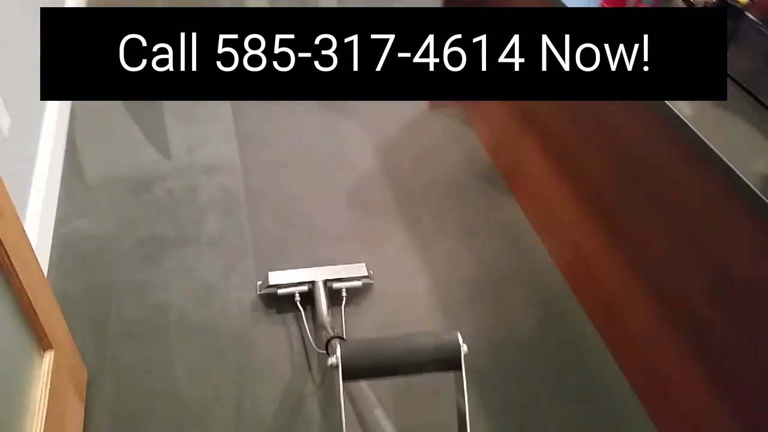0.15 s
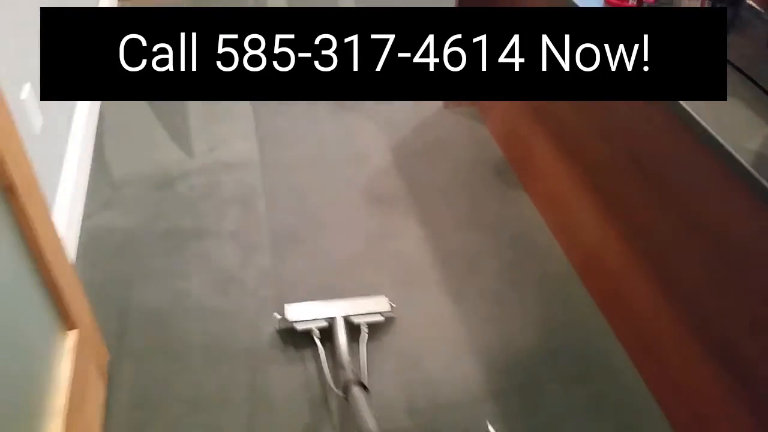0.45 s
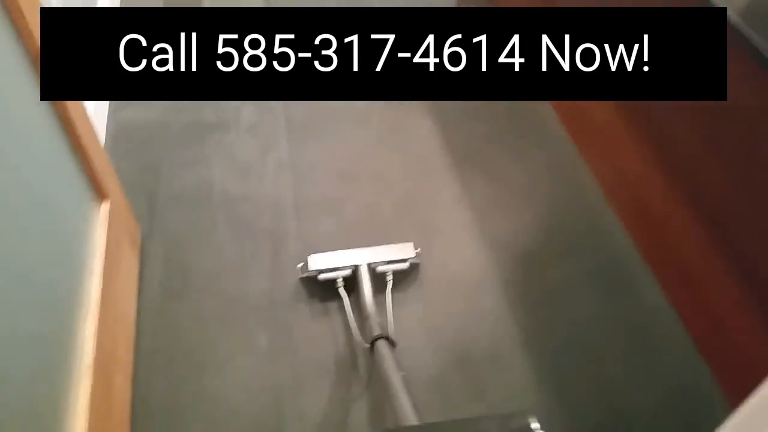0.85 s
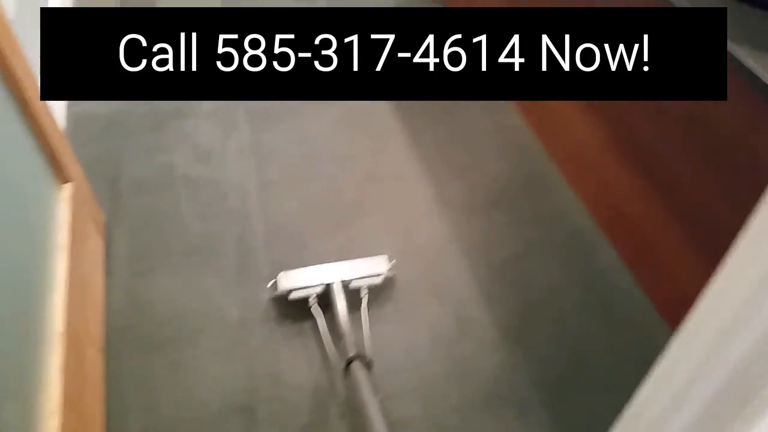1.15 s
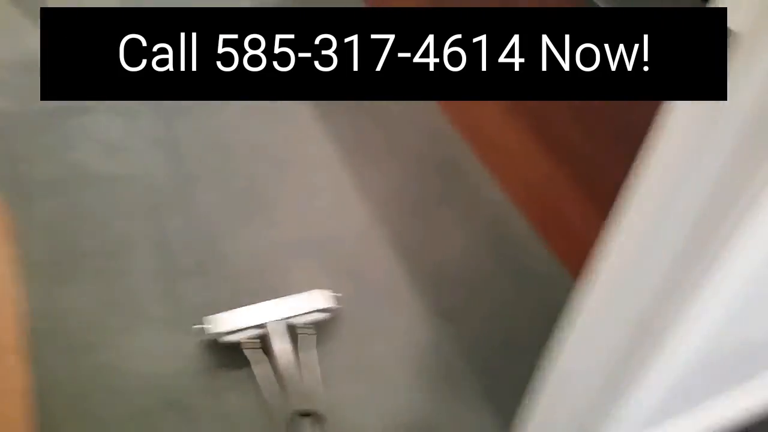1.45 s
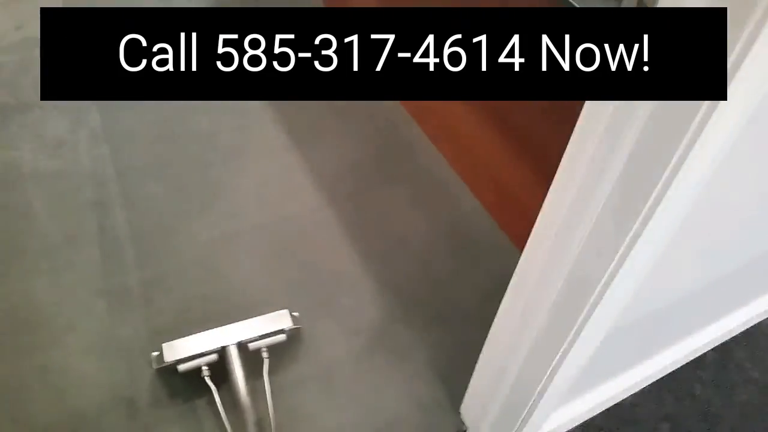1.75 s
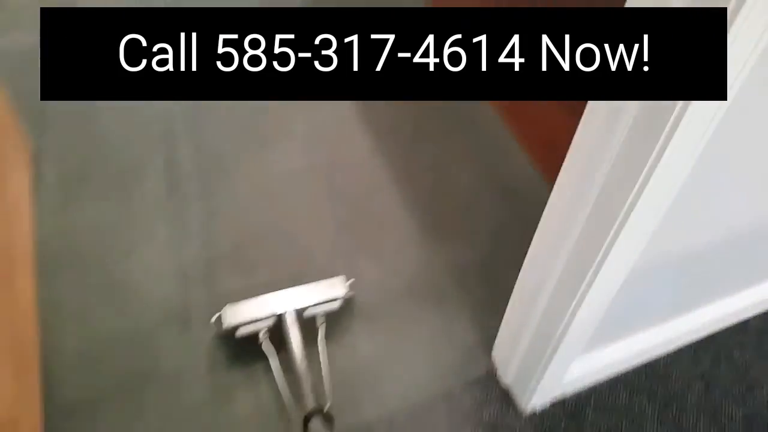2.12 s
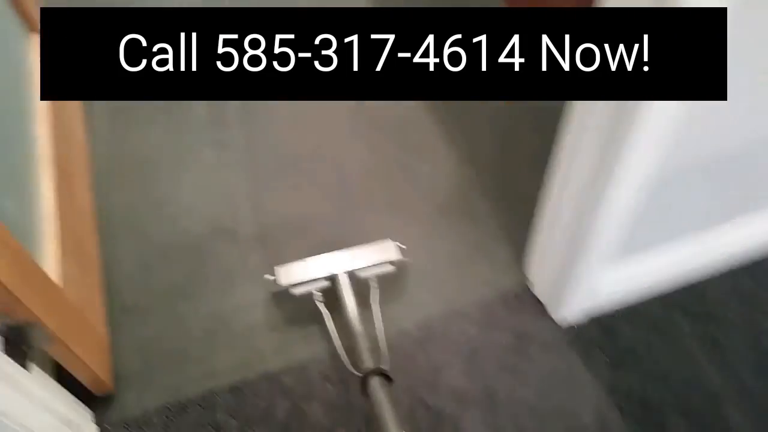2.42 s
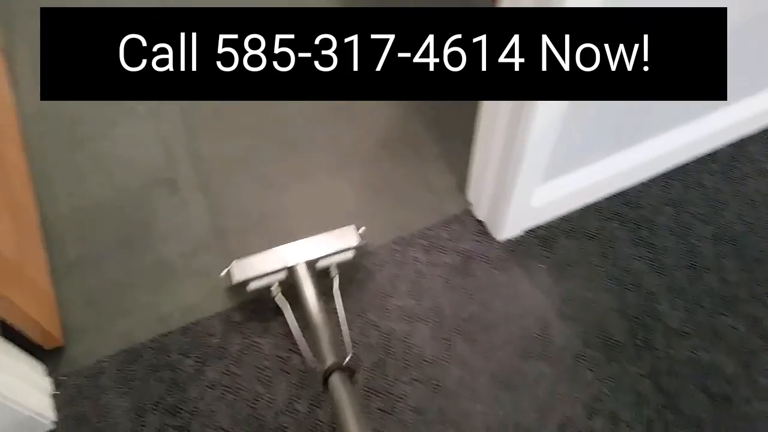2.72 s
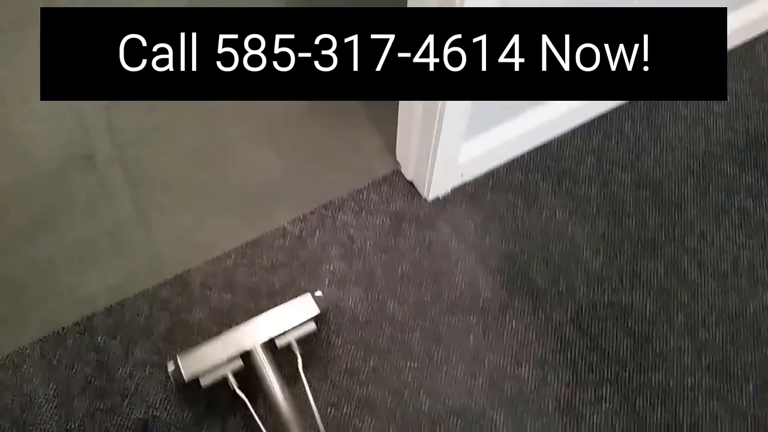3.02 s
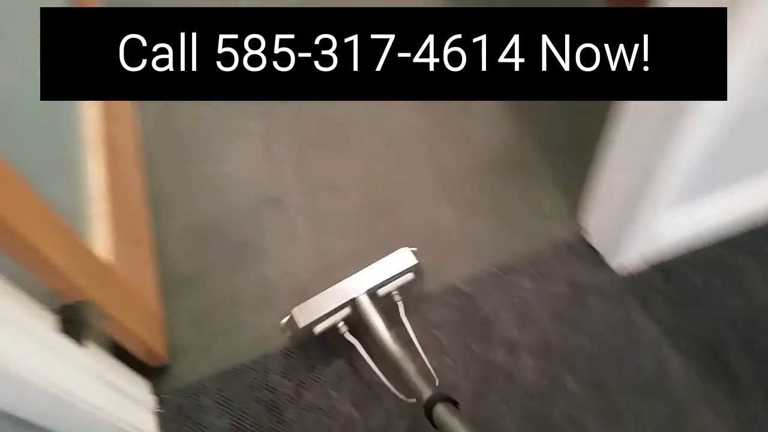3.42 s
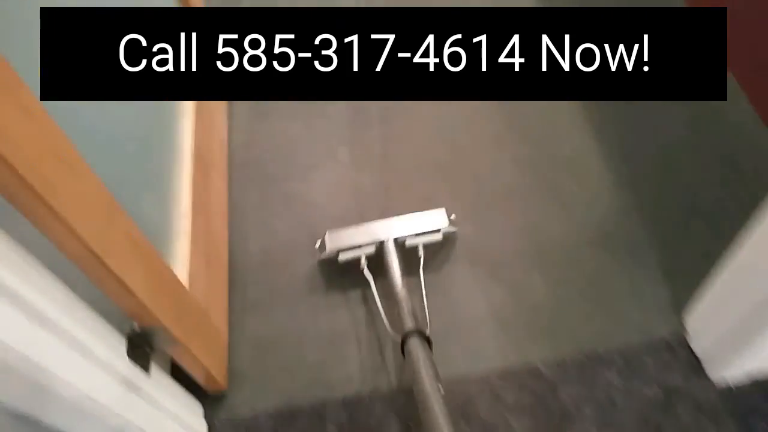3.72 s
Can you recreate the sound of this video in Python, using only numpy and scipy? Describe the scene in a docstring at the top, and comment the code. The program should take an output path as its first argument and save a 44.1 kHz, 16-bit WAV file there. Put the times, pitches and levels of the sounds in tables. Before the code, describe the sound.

A carpet cleaning wand sucks with a bright, fluttering hiss, close and mostly left, over a low machine drone. One dull thump comes early. Later the hiss dulls as the wand slurps, rumbles and catches, then it returns.

```python
"""A bright, fluttering hiss, close and mostly to the left: a carpet extractor's wand drawn over carpet.
Air tears through its slot, which rings broadly near 2 kHz, over the machine's low drone. Early on, one
dull thump rings the floor. On the ribbed carpet of a doorway the seal breaks: the hiss dulls, gaps
slurp, and the lip rumbles and catches until it is pushed back and the hiss returns."""
import sys
import numpy as np
from scipy import signal
from scipy.fft import rfft, irfft, next_fast_len
from scipy.io import wavfile
from scipy.ndimage import uniform_filter1d, map_coordinates

SR = 44100
rng = np.random.default_rng(int(sys.argv[2]) if len(sys.argv) > 2 else 0)


def dump(signal):
    """Clip the signal to [-1, 1] and save it as 16-bit WAV at the path in sys.argv[1]."""
    limited = np.clip(np.atleast_2d(signal).T, -1, 1)
    pcm = np.round(limited * 32767).astype(np.int16)
    wavfile.write(sys.argv[1], SR, pcm)


N = 170667

# tone of the low rumble in the thump and the dragging lip (frequency [Hz], level [dB])
RUMBLE_EQ = [(25, -25), (60, -21), (100, 1), (160, 1), (230, -1.5), (350, -4.5), (480, -18), (700, -18),
             (2000, -60)]
# tone of the brighter scrub on top of that rumble (frequency [Hz], level [dB])
SCRUB_EQ = [(200, 2), (420, 1), (580, -1.5), (880, 1.5), (1100, -2.5), (1600, -6), (3000, -11), (9000, -28)]


def amp(db):
    """Decibels to gain."""
    return 10 ** (np.asarray(db) / 20)


def unit(x):
    """Scale to rms 1."""
    return x / np.sqrt(np.mean(x ** 2) + 1e-20)


def along(points, hz):
    """Read (frequency, value) points on a log frequency axis."""
    freqs, values = np.transpose(points)
    return np.interp(np.log(hz + 1), np.log(freqs + 1), values)


def curves(rows, t=None):
    """One automation curve for each column after the time, per sample or at the times t."""
    times, *columns = np.transpose(rows)
    return [np.interp(np.arange(N) / SR if t is None else t, times, column) for column in columns]


def wobble(rate):
    """A smooth random curve, rate knots a second."""
    return map_coordinates(rng.standard_normal(4096), [np.arange(N) * rate / SR], mode="mirror")


def filtered(x, response):
    """Equalise x with the gain response(hz)."""
    size = next_fast_len(N + SR // 2)
    return irfft(rfft(x, size) * response(np.fft.rfftfreq(size, 1 / SR)), size)[..., :N]


def add(out, start, x):
    """Mix x into out at start seconds."""
    i = round(start * SR)
    out[i:i + len(x)] += x[:N - i]


def pan_left(x):
    """The left side hears the wand better than the right, most of all in the treble."""
    # lead of left over right (frequency [Hz], level [dB])
    left_lead = [(40, 3), (150, 5.5), (300, 6.8), (800, 6.7), (1500, 8.8), (2200, 11.7), (3200, 12),
                 (4200, 14), (5000, 13), (5900, 14.5), (6800, 8.8), (7700, 2.1), (8500, 4.9), (9500, 8),
                 (14000, 8)]

    def gains(hz):
        right = amp(-along(left_lead, hz))
        return np.array([np.ones_like(hz), right]) * 2 / (1 + right)
    return filtered(x, gains)


def placed(pair):
    """Spread two unrelated noises: narrow bass, wide treble, leaning left, with a centre of rms 1."""
    # likeness of left and right (frequency [Hz], correlation [0-1])
    likeness = [(100, 0.85), (250, 0.8), (500, 0.5), (1000, 0.26), (2200, 0.24), (4500, 0.11),
                (8000, 0.0092), (14000, 0)]

    def mid_side_gains(hz):
        angle = np.arccos(np.clip(along(likeness, hz), -1, 1)) / 2
        return np.array([np.cos(angle), np.sin(angle)])
    mid, side = filtered(pair, mid_side_gains)
    out = pan_left(np.array([mid + side, mid - side]))
    return out / np.std(out.mean(axis=0))


def turbulence(shape):
    """Two channels of patchy noise with the gain shape(hz, t) and a scoop in the low mids."""
    # the scoop deepens as the wand comes nearer (time [s], depth [dB])
    scoop_depth = [(0, 2.5), (.6, 2), (1.3, 6), (2.0, 9.5), (2.45, 14), (2.85, 10.5), (3.1, -1.5), (3.6, 9),
                   (3.87, 8)]
    scoop_hz, scoop_width_hz, patchy_db = 584, 94, 1.62
    hz, t, spectrum = signal.stft(rng.standard_normal((2, N)), SR, nperseg=1024)
    hz = hz[:, None]
    patches = uniform_filter1d(rng.standard_normal(spectrum.shape[1:]), size=4, axis=0)
    patches = uniform_filter1d(patches, size=7, axis=1)
    scoop_db = curves(scoop_depth, t)[0] * np.exp(-((hz - scoop_hz) / scoop_width_hz) ** 2)
    spectrum = spectrum * shape(hz, t) * amp(patchy_db * unit(patches) - scoop_db)
    return signal.istft(spectrum, nperseg=1024)[1][:, :N]


def coloured(eq):
    """Stereo turbulence through a static EQ curve."""
    noise = turbulence(lambda hz, t: 1)
    return placed(filtered(noise, lambda hz: amp(along(eq, hz))))


def resonant(track, width_hz):
    """Stereo turbulence ringing in a resonance whose centre follows track."""
    def peak(hz, t):
        centre_hz = curves(track, t)[0]
        return 1 / (1 + ((hz - centre_hz) / width_hz) ** 2)
    return placed(turbulence(peak))


def suction():
    """Air tears through the slot: three bands and two resonances flutter together under a fine fizz."""
    # bright hiss, high while the slot seals on the pile (time [s], level [dB])
    hiss_fader = [(0, -20.5), (.25, -22), (.62, -20.5), (1.2, -21.5), (1.42, -21), (2.0, -21.5),
                  (2.45, -22.5), (2.645, -22.5), (2.68, -31.5), (2.86, -35.5), (2.99, -28), (3.05, -29.5),
                  (3.12, -28), (3.23, -28), (3.3, -32.5), (3.45, -31.5), (3.48, -23), (3.72, -21.5),
                  (3.87, -23)]
    # duller rush of air into the wand (time [s], level [dB])
    rush_fader = [(0, -22.8), (.27, -25), (.67, -22.8), (1.55, -23.8), (1.82, -23.4), (2.2, -24),
                  (2.62, -24.3), (2.78, -23), (2.86, -27), (2.95, -22), (3.06, -26.5), (3.17, -26),
                  (3.23, -28.5), (3.29, -25), (3.32, -26.5), (3.37, -22.3), (3.42, -26.5), (3.5, -23.7),
                  (3.87, -24)]
    # low body of the airflow, which chokes as the wand turns (time [s], level [dB])
    body_fader = [(0, -31.5), (.65, -31.5), (1.0, -33), (1.8, -32.5), (2.3, -33.5), (2.62, -33.5),
                  (2.8, -31), (3.0, -31), (3.18, -33), (3.23, -44), (3.31, -39), (3.36, -31), (3.55, -32),
                  (3.87, -32.5)]
    # fizz in the top octave (time [s], level [dB])
    fizz_fader = [(0, -27), (.45, -28), (1.1, -28), (1.6, -29), (1.98, -30.5), (2.25, -29.5), (2.63, -28.5),
                  (2.72, -39), (2.85, -45), (2.98, -37), (3.1, -35.5), (3.16, -34.5), (3.43, -38.5),
                  (3.52, -30), (3.72, -26.5), (3.87, -28.5)]
    # tone of each of those four bands (frequency [Hz], level [dB])
    hiss_eq = [(500, -46), (2000, -20), (3200, -23), (4000, -3.5), (5000, -2.5), (5500, -1), (6400, -1),
               (6800, -6.5), (7400, -9.5), (8200, -13), (10000, -23), (14400, -41)]
    rush_eq = [(500, -37), (1500, -15), (2050, -12), (2550, -6), (3000, -4.5), (3500, -1), (4200, -1),
               (4750, -3.5), (5300, -5), (6300, -11.5), (7200, -15), (14400, -35)]
    body_eq = [(200, -9.5), (450, -1.5), (850, 0), (1150, -0.5), (1550, -2), (2100, 2.5), (2700, 0.5),
               (3500, -13), (6000, -16)]
    fizz_eq = [(4000, -5), (7000, -3.5), (8500, -4), (10800, 1), (11600, -1), (14400, -3)]
    # upper resonance of the nozzle (time [s], centre [Hz])
    nozzle_track = [(0, 5850), (.6, 5870), (1.5, 5800), (2.0, 6040), (2.3, 6000), (2.62, 5900), (2.8, 6000),
                    (3.0, 5700), (3.15, 6030), (3.55, 5700), (3.87, 5830)]
    # resonance of the slot (time [s], centre [Hz], level [dB])
    slot_track = [(0, 2010, -29.5), (.3, 2060, -31.5), (.65, 2100, -32.5), (1.0, 2090, -35),
                  (1.4, 2150, -36.5), (1.85, 2190, -29), (2.2, 2300, -36.5), (2.3, 2300, -31),
                  (2.42, 2340, -30), (2.6, 2420, -37), (2.85, 2230, -31), (3.0, 2120, -55),
                  (3.23, 2300, -41), (3.36, 2120, -46), (3.87, 2180, -33)]
    hiss_db, slot_db = curves(hiss_fader)[0], curves(slot_track)[1]
    flutter_db = 0.32 * wobble(21) + 0.34 * wobble(55) + 0.7 * wobble(400)  # sway, flutter, spatter
    # each layer's gain: its fader, a trim and a waver of its own, all in dB
    hiss = amp(hiss_db - 1.5 + 0.26 * wobble(24.33)) * coloured(hiss_eq)
    nozzle = amp(hiss_db - 4 + 0.91 * wobble(24.76)) * resonant(nozzle_track, width_hz=470)
    rush = amp(curves(rush_fader)[0] - 1 + 0.63 * wobble(20)) * coloured(rush_eq)
    body = amp(curves(body_fader)[0] + 0.86 * wobble(29.94)) * coloured(body_eq)
    fizz = amp(curves(fizz_fader)[0] - 1.5 + 0.5 * wobble(35)) * coloured(fizz_eq)
    slot = amp(slot_db - 2.5 + 1.95 * wobble(30.38)) * resonant(slot_track, width_hz=160)
    return amp(flutter_db) * (hiss + nozzle + rush + body + slot) + fizz


def wall_echoes(x):
    """Weak early echoes, different on each side, ripple the spectrum and drift as the wand moves."""
    # echoes off the nearby walls and door (nominal delay [ms])
    delays = [3.7, 6.1, 9.4, 13.3, 18.2]
    echo_db, drift_ms = -21, .35
    out = x.copy()
    for side in range(2):
        for ms in delays:
            lag = (ms * rng.uniform(.8, 1.2) + drift_ms * wobble(1)) * SR / 1000
            out[side] += amp(echo_db) * map_coordinates(x[side], [np.arange(N) - lag])
    return out * np.std(x) / np.std(out)


def machine_drone():
    """The extractor and its hose lay a steady low drone under everything."""
    # tone of the drone (frequency [Hz], level [dB])
    drone_eq = [(20, -30), (32, -15), (44, 3), (58, 7), (75, -1), (100, -2.5), (145, 3.5), (190, -3),
                (290, -0.5), (420, -11.5), (560, 1.5), (800, -12), (1500, -29), (6000, -50)]
    return amp(-40 + 0.4 * wobble(8.6)) * coloured(drone_eq)


def thump():
    """A soft, heavy knock sets the floor ringing, with a noisy thud on the first contact."""
    # the knock and its rebound (time [s], level [dB])
    knocks = [(0.2232, -19), (.252, -15)]
    # modes of the floor (frequency [Hz], level [dB], t60 [s])
    floor_modes = [(94.5, 0, 0.33), (140, 2.5, .12), (206, -0.5, .065), (296, -4, 0.064), (417, -7, 0.044)]
    attack_s, thud_t60, thud_trim_db, slap_db = .004, 0.14, -1.5, -7
    t = np.arange(N) / SR
    ring = sum(amp(db - 60 * t / t60) * np.sin(2 * np.pi * hz * t) for hz, db, t60 in floor_modes)
    floor, thud_envelope = np.zeros(N), np.zeros(N)
    for start, db in knocks:
        add(floor, start, amp(db - 2.5) * ring * (1 - np.exp(-t / attack_s)))
    start, db = knocks[0]
    add(thud_envelope, start, amp(db + thud_trim_db - 60 * t / thud_t60))
    thud_noise = coloured(RUMBLE_EQ) + amp(slap_db) * coloured(SCRUB_EQ)
    return pan_left(floor) + thud_envelope * thud_noise


def lip_drag():
    """The lip judders and scrubs over the ribs and now and then catches on one with a low bump."""
    # the lip dragging over ribbed carpet (time [s], rumble level [dB], scrub level [dB])
    drag_faders = [(2.5, -60, -60), (2.7, -43, -67), (2.9, -36, -51), (2.97, -26, -29.5),
                   (3.07, -26.5, -31), (3.15, -24, -33), (3.21, -38.5, -33), (3.3, -36.5, -38),
                   (3.38, -28, -39), (3.5, -32.5, -30), (3.59, -35.5, -41), (3.7, -31, -35.5),
                   (3.87, -37, -33)]
    # the lip catching on a rib (time [s], level [dB])
    catches = [(2.657, -19), (3.021, -18), (3.12, -17), (3.166, -10), (3.351, -18), (3.4, -18),
               (3.468, -10)]
    bump_hz, bump_t60, attack_s = 140, 0.029, .003
    rumble_db, scrub_db = curves(drag_faders)
    judder_db = 2 * wobble(60)
    rumble = amp(rumble_db + judder_db) * coloured(RUMBLE_EQ)
    scrub = amp(scrub_db + judder_db / 2) * coloured(SCRUB_EQ)
    bumps, t = np.zeros(N), np.arange(SR // 5) / SR
    for start, db in catches:
        envelope = amp(db + 6 - 60 * t / bump_t60) * (1 - np.exp(-t / attack_s))
        add(bumps, start, envelope * np.sin(2 * np.pi * bump_hz * t))
    return rumble + scrub + pan_left(bumps)


def slurps():
    """Gaps under the lifted lip open and close, each a short, rough resonance, most of them gliding."""
    # air through each gap (peak time [s], half-length [s], centre [Hz], glide [Hz/s], level [dB])
    gaps = [(2.663, .14, 4150, 1198, -28), (2.736, .07, 5220, -2500, -27.5), (2.8, 0.11, 3530, -3200, -28),
            (2.921, .035, 1850, 0, -24.5), (2.942, 0.025, 5050, 0, -24.5), (2.97, 0.064, 3480, 1800, -35),
            (2.992, 0.032, 5450, 1500, -25), (3.37, 0.031, 4160, 0, -38), (3.465, .05, 3680, 0, -31)]
    roughness_db = 2
    out, t = np.zeros((2, N)), np.arange(N) / SR
    for peak_s, half_s, hz, glide, db in gaps:
        track = [(peak_s - half_s, hz - glide * half_s), (peak_s + half_s, hz + glide * half_s)]
        swell = np.exp(-2 * ((t - peak_s) / half_s) ** 2)
        out += amp(db + roughness_db * wobble(90)) * swell * resonant(track, width_hz=240)
    return out


def choke():
    """A brief duck in gain: the airflow chokes as the wand turns."""
    at_s, width_s, depth_db = 3.235, .035, 4
    return amp(-depth_db * np.exp(-((np.arange(N) / SR - at_s) / width_s) ** 2))


def scene():
    """The stereo mix: airflow with its echoes, plus the dragging lip, the thump and the drone."""
    # the airflow's pan shifts as the listener turns (time [s], cut on the right [dB])
    right_cut = [(0, 0.7), (.8, -0.5), (1.7, 0.2), (2.7, 0.2), (3.1, .5), (3.87, -0.8)]
    air = wall_echoes(choke() * suction() + slurps())
    pan = np.array([np.ones(N), amp(-curves(right_cut)[0])])
    return air * pan + lip_drag() + thump() + machine_drone()


def record(dry):
    """A soft clip rounds off the highest peaks, then a brick-wall low-pass trims the very top."""
    ceiling, knee, cutoff_hz = .85, 8, 14550
    clipped = dry / (1 + np.abs(dry / ceiling) ** knee) ** (1 / knee)
    return filtered(clipped, lambda hz: hz < cutoff_hz)


dry = scene()
out = record(dry)
dump(out)
```